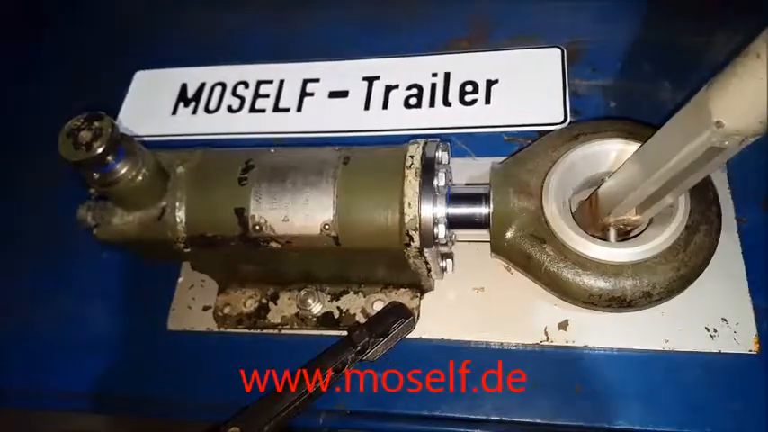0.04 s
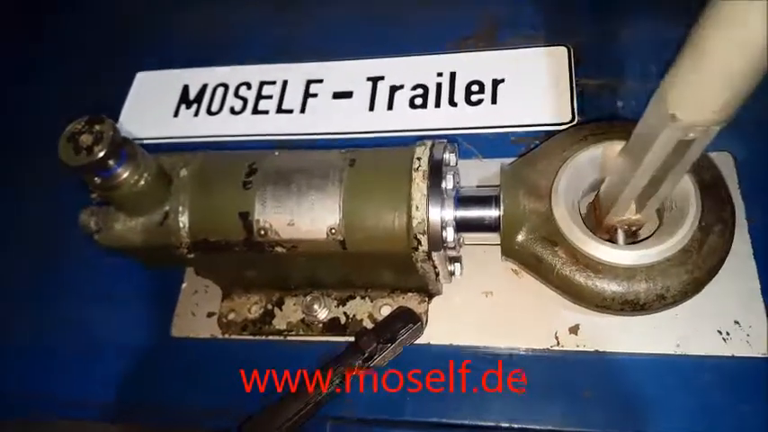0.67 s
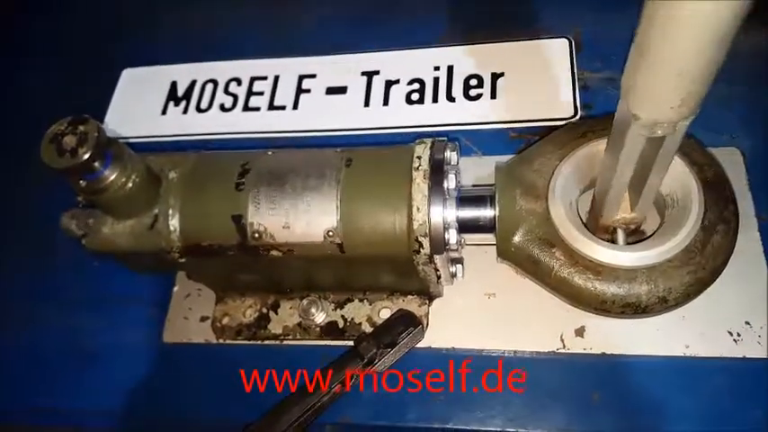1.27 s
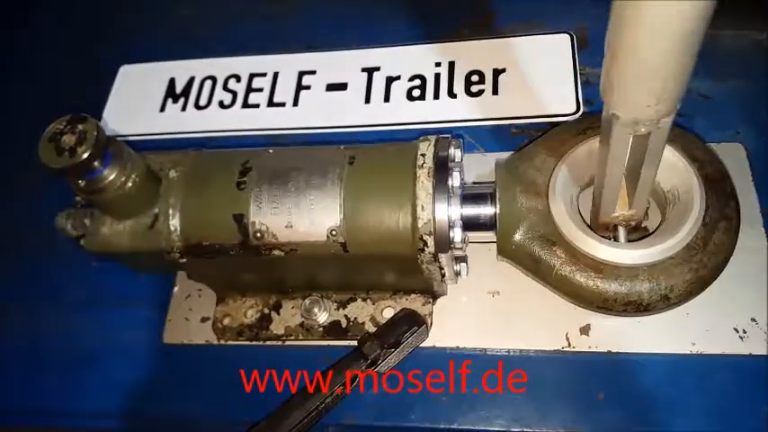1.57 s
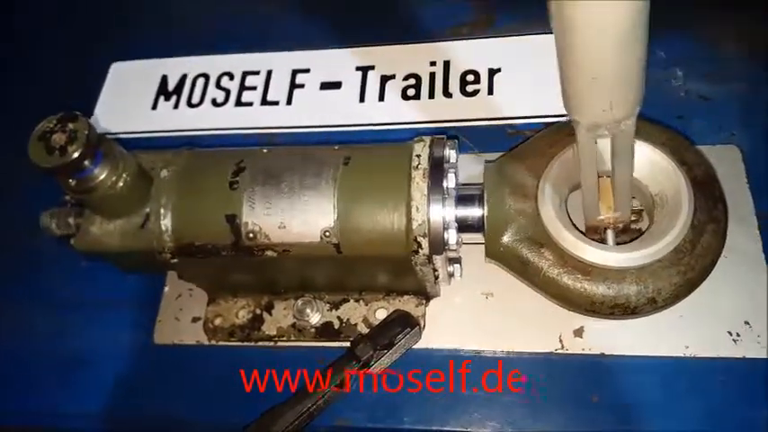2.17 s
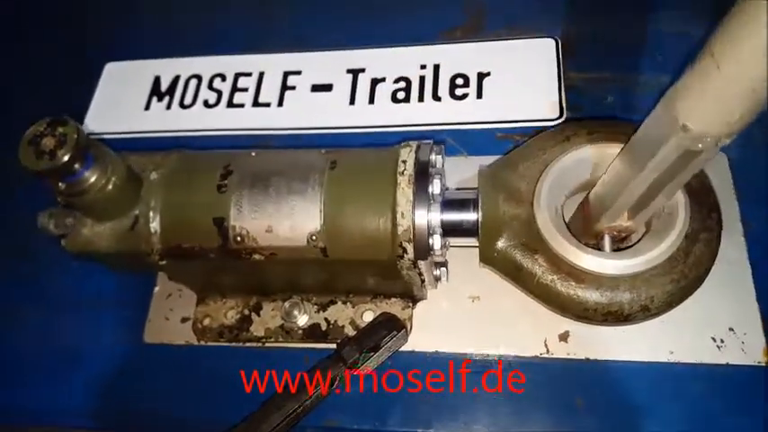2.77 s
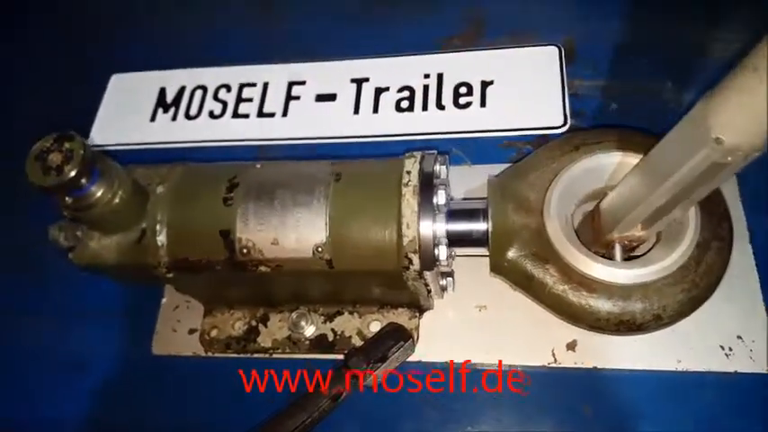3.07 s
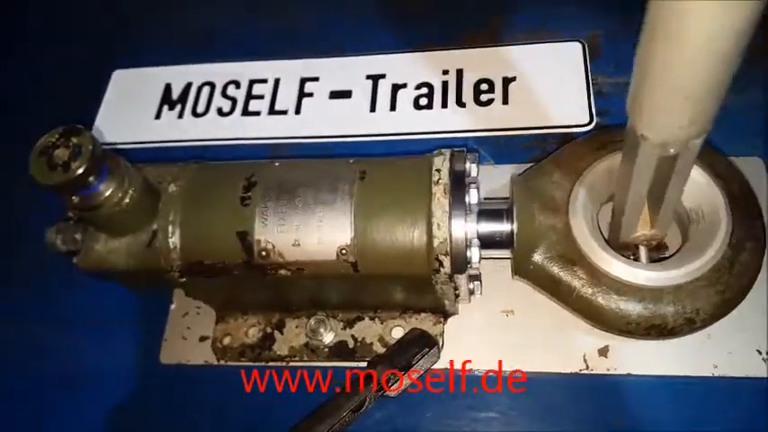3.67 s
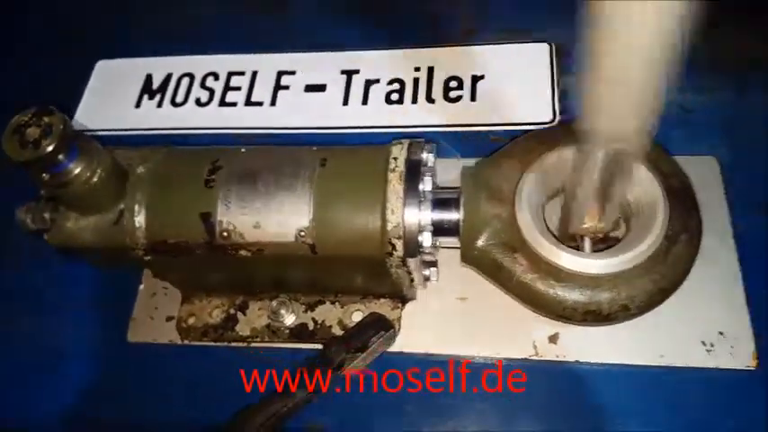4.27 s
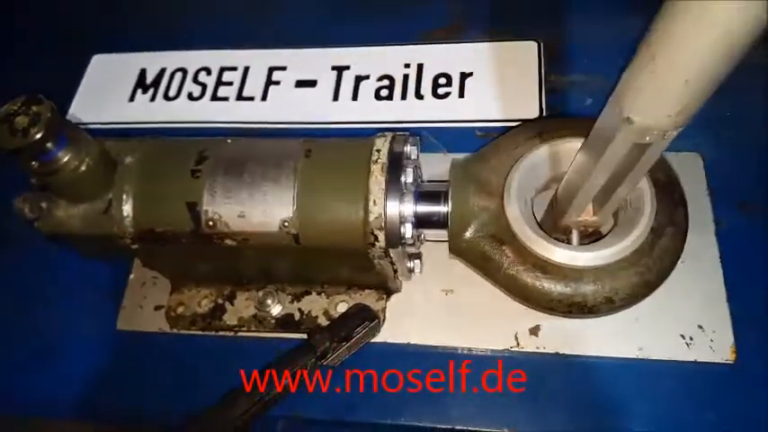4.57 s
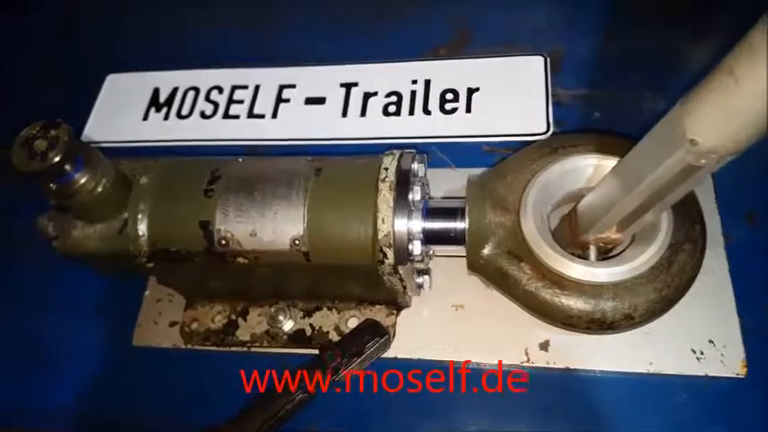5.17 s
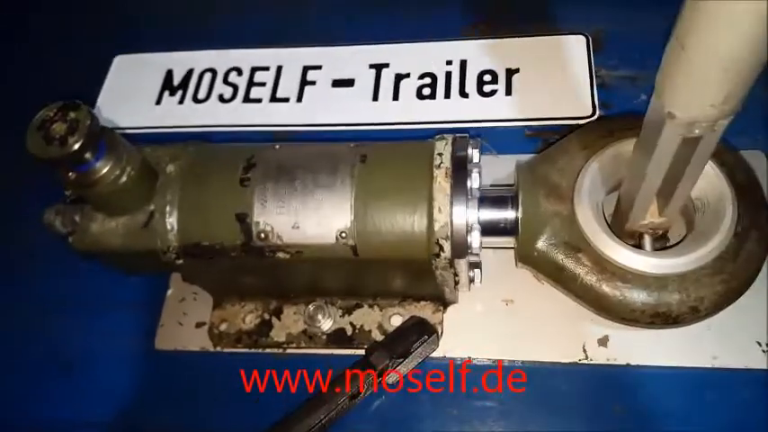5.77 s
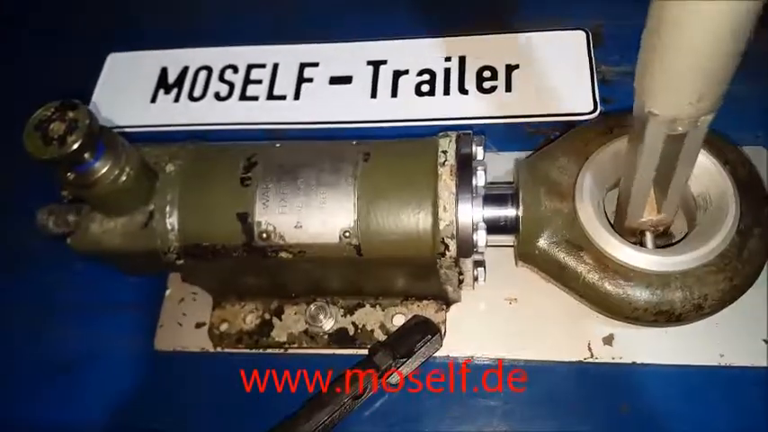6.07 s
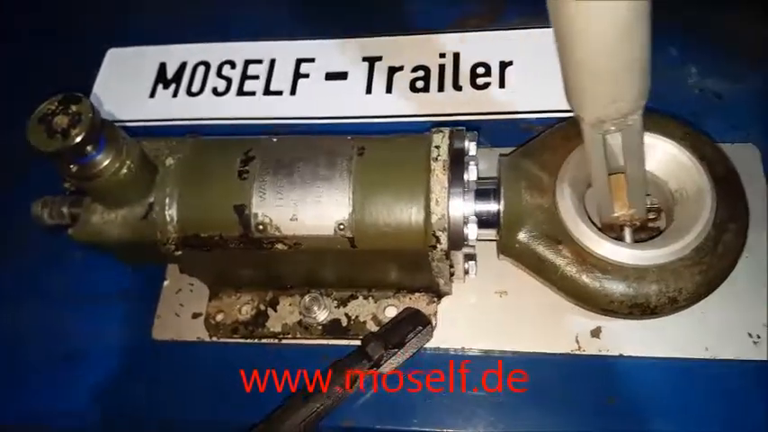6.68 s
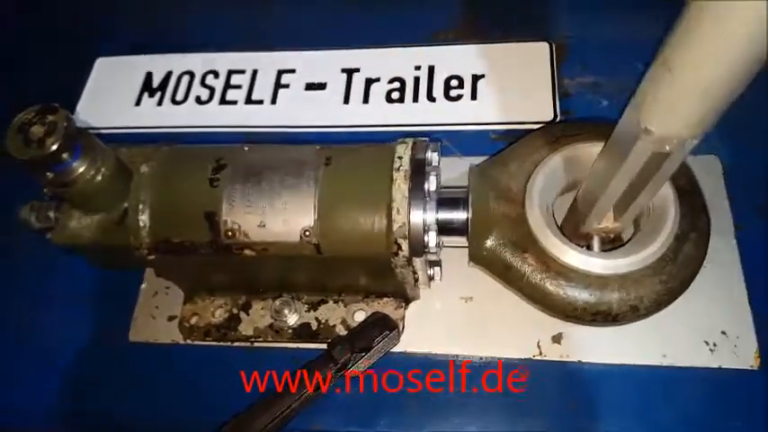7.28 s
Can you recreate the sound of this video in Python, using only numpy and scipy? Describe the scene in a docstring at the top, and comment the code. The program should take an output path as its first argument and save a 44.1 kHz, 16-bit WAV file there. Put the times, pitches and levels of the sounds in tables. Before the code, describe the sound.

Faint hiss and low room rumble run throughout. At about 0.2 seconds there is a tiny tick, then at 0.35 a steel bar clacks against the end ring of a hydraulic trailer damper, rattles and rings brightly, with a low thud from the workbench beneath. After a pause, the bar is levered back and forth five more times, landing at about 2.2, 3.4, 4.3, 5.5 and 6.9 seconds. Each stroke is a quick cluster of hard metallic clacks, followed by high ringing that fades in about half a second and a heavy, shuddering boom from the bench. The fifth rings strongly and the last cracks sharpest. From 2 seconds on, the bar scrapes softly over gritty steel between blows, with a few tiny clicks, and a last scrape runs from 7.2 seconds to the end. The sound is close and in stereo, with a hard-walled workshop echoing for about a second.

```python
"""Over a faint hiss comes a tiny tick, then steel clacks on steel and a workbench booms.
A steel bar levers the towing eye (the end ring) of a hydraulic trailer damper to and fro, six strokes
in all. Each time the bar rattles across the gap in the eye and lands with a clack. Bar, pin, barrel and
eye ring on, the bench booms under the load, and between blows the bar scrapes softly.
A hard-walled workshop echoes around two close microphones."""
import sys
import numpy as np
from scipy import signal
from scipy.fft import rfft, irfft
from scipy.io import wavfile
from scipy.ndimage import map_coordinates

SR = 44100
rng = np.random.default_rng(int(sys.argv[2]) if len(sys.argv) > 2 else 0)


def unload_audio(sound):
    """Save the sound as a 16-bit wav file, at the path given as the first command line argument."""
    columns = np.transpose(np.atleast_2d(sound))
    # keep every value between -1 and 1, then stretch to whole-number steps
    steps = np.round(np.clip(columns, -1, 1) * 32767)
    wavfile.write(sys.argv[1], SR, steps.astype(np.int16))


N = 332506


def undb(db):
    """Turn decibels into a number to multiply by."""
    return 10 ** (np.asarray(db) / 20)


def band(x, low_hz, high_hz, order=3):
    """Keep the sound between two frequencies."""
    sos = signal.butter(order, [low_hz, min(high_hz, .47 * SR)], "band", fs=SR, output="sos")
    return signal.sosfilt(sos, x)


def fade(fade_s, count=SR):
    """Die away by 60 dB in fade_s seconds; all fade times below mean this."""
    return np.exp(-np.log(1000) * np.arange(count) / SR / max(fade_s, .001))


def swell(rise_s, count=SR):
    """Rise from nothing to full strength."""
    return 1 - np.exp(-np.arange(count) / SR / rise_s)


def unit(x):
    """Scale a blow to the energy of 10 ms at full level."""
    return x / np.sqrt(np.sum(x ** 2, axis=-1, keepdims=True) / (SR / 100))


def add(track, start_s, x):
    """Mix x into the track at start_s."""
    i = int(start_s * SR)
    track[..., i:i + x.shape[-1]] += x[..., :N - i]


def look_up(hz, table, column=1):
    """Read a table at any frequency, blending between its rows."""
    table = np.array(table)
    return np.interp(np.log(hz), np.log(table[:, 0]), table[:, column])


def tilt(hz, db_per_octave, pivot_hz):
    """Decibels on a straight slope that is zero at pivot_hz."""
    return db_per_octave * np.log2(hz / pivot_hz)


def diffuse(count, wide_hz):
    """Spectra of noise from all sides at two microphones: alike in the bass, unrelated in the treble."""
    hz = np.fft.rfftfreq(count, 1 / SR) + 1
    mid, side = rfft(rng.standard_normal((2, count)))
    apart = hz / np.hypot(hz, wide_hz)
    return hz, (mid + np.array([[1], [-1]]) * apart * side) / np.sqrt(1 + apart ** 2)


def air(level_db=-56.5):
    """The room rumbles faintly under microphone hiss."""
    # tone of the still air and hiss: frequency_hz, level_db
    hiss_tone = [(15, -43.5), (25, -14.5), (53, -3), (97, -15.5), (263, -11), (394, -20), (607, -20),
                 (840, -26), (1330, -30), (3620, -38), (9570, -47.5), (11300, -45), (16000, -43)]
    hz, noise = diffuse(N, wide_hz=152)
    hiss = irfft(noise * undb(look_up(hz, hiss_tone)), N)
    return hiss * undb(level_db) / np.std(hiss)


def chatter(fade_s, low_hz, high_hz, width=0.87, spiky=0.27, rise_s=0.00056):
    """Two surfaces bounce and grind: a dying burst of tiny uneven hits, different left and right."""
    count = SR // 4
    mid, side, sizes = rng.standard_normal((3, count))
    grains = (mid + width * np.array([[1], [-1]]) * side) * np.exp(spiky * sizes)
    burst = grains * fade(fade_s, count) * swell(rise_s, count)
    return unit(band(burst, low_hz, high_hz, order=4))


def ticks(gain_db=-8, fade_s=.008):
    """The linked parts click lightly as they settle."""
    # light ticks: start_s, level_db
    clicks = [(0.228, -66), (1.112, -58.5), (2.815, -55), (2.834, -55), (5.031, -52)]
    out = np.zeros((2, N))
    for start_s, db in clicks:
        add(out, start_s, undb(db + gain_db) * chatter(fade_s, 3500, 14000, rise_s=.0002))
    return out


def wall_echoes(rise_s=0.0018):
    """Dense echoes of one instant of sound build up quickly and die away, the treble first."""
    # the workshop's echo: frequency_hz, level_db, fade_s
    room = [(60.5, -9, 0.79), (159, 3, 1), (425, 3.5, 0.94), (1225, -10, 0.9), (2700, -6.5, 0.83),
            (4300, -9, .66), (8000, -12, 0.6), (14100, -8, 0.5)]
    count = 3 * SR // 2
    hz, noise = diffuse(count, wide_hz=825)
    tail = 0
    for octave in np.arange(5, 15):  # 32 Hz to 16 kHz
        share = np.clip(1 - abs(np.log2(hz) - octave), 0, 1)
        wash = irfft(noise * share * undb(look_up(hz, room)), count)
        fade_s = look_up(2. ** octave, room, column=2)
        gain = np.sqrt(np.log(1000) / fade_s / SR)  # a longer tail is no louder in all
        tail = tail + gain * fade(fade_s, count) * wash
    return tail * swell(rise_s, count)


def workshop(x):
    """Sound thrown to the left and to the right meets different walls."""
    return sum(signal.fftconvolve(side[None], wall_echoes(), axes=1)[:, :N] for side in x)


def ring(tones, detune, scatter_db=0.5, count=SR):
    """An object's own tones fade; each blow lands elsewhere, so levels and pitches vary a little."""
    t = np.arange(count) / SR
    chance = rng.standard_normal((len(tones), 3))
    out = np.zeros(count)
    for (hz, db, fade_s), (sign, size, shift) in zip(tones, chance):
        wave = np.sign(sign) * np.sin(2 * np.pi * hz * (1 + detune * shift) * t)
        out += undb(db + scatter_db * size) * fade(fade_s, count) * wave
    return out


def ringing_parts(swing_db=10, swing_fade_s=0.096, held_fade_s=0.26, waver=0.2, wobble=0.0016):
    """A struck part swings hard at first, rings on unsteadily, and dies once a contact holds it."""
    # parts left free to ring: start_s, part, level_db, free_s
    strikes = [(0.349, "bar", -30, 0.39), (0.548, "barrel", -43, 0.77), (2.236, "pin", -41.5, 0.1),
               (2.406, "barrel", -43, 0.16), (3.281, "eye", -72, .06), (3.424, "barrel", -42.5, 0.46),
               (4.299, "eye", -54, .05), (5.446, "bar", -50, 0.0033), (5.531, "barrel", -28.5, 0.47),
               (5.535, "eye", -45.5, 0.094), (6.888, "eye", -59, 0.024), (6.96, "eye", -46, 0.14)]
    # each steel part's own tones: pitch_hz, level_db, fade_s
    part_tones = { "bar": [(1965, -13, .4), (2536, -14, .3), (4320, -5, .3), (4390, -5, .7),
                  (4455, -3, .45), (4492, -4, .3), (5075, -7, .3), (5130, 1, .65), (5165, -6, .3),
                  (5375, -15, .5), (10970, -13, .24), (11050, -19, .2), (12540, -22, .35),
                  (13680, -26, .28)], "barrel": [(3022, 1, .62), (3038, -5, .55), (3531, -17, .5),
                  (3870, -5, .22), (4800, -9, .08)], "pin": [(2003, -4, 0.36), (2223, -0.5, .4),
                  (2510, 2.5, 0.53), (3138, -0.5, .4), (5100, -2.5, .4), (5870, -0.5, .5), (5620, -2, .5),
                  (5905, 2.5, 0.46), (6130, -6.5, .4)], "eye": [(4000, -4, .2), (7757, 3, .3),
                  (7941, 6, .35), (8070, 9, .3), (8400, -2, .2), (12807, -16, .25)]}
    out = np.zeros(N)
    for start_s, part, db, free_s in strikes:
        tone = ring(part_tones[part], detune=.0003)
        shake, rock = band(rng.standard_normal((2, SR)), 7.3, 45, order=2)
        speed = 1 + wobble * rock / np.std(rock)  # rocking in its seat bends the pitch
        tone = map_coordinates(tone, [np.cumsum(speed)])
        swing = 1 + undb(swing_db) * fade(swing_fade_s)
        held_s = np.clip(np.arange(SR) / SR - free_s, 0, None)
        damping = np.exp(-np.log(1000) * held_s / held_fade_s)
        flutter = 1 + waver * shake / np.std(shake)
        add(out, start_s, undb(db) * swing * damping * flutter * tone)
    return out


def clacks(knock_db=-6, fizz_db=-4, room_db=4, glance_dryness=0.26):
    """Bar hits eye: a clank and a crack, brighter the sharper the edge that lands."""
    # steel landing on steel: start_s, level_db, sharpness_db_per_octave, fade_s
    hits = [(0.3499, -28, 0.4, 0.039), (0.468, -40, -3.5, .03), (0.54, -38, -0.5, 0.018),
            (0.546, -33.5, -5, 0.013), (0.573, -47, -7, 0.022), (0.636, -44, 5.5, 0.0081),
            (2.2086, -39.5, -3.5, .03), (2.2357, -19.5, 3, .02), (2.351, -33, 4, 0.02),
            (2.356, -34, 7, 0.037), (2.408, -22.5, 0.5, 0.015), (2.414, -37.5, -9.5, 0.011),
            (3.281, -61, -11.5, .03), (3.344, -31.5, 0.5, .032), (3.388, -33.5, 1.5, 0.1),
            (3.397, -37.5, -7.5, .03), (3.4182, -41, 7, .03), (3.424, -27, -2, 0.0093),
            (4.258, -46, -7, 0.024), (4.3009, -37, 4.5, 0.015), (4.331, -43.5, -8.5, 0.036),
            (4.349, -29.5, -2, 0.05), (4.3541, -29.5, 6.5, .03), (4.375, -28.5, 4, 0.019),
            (4.384, -28, -2, .04), (5.193, -72, -9.5, .03), (5.4475, -52, 0, .03),
            (5.472, -38.5, -2.5, 0.033), (5.5037, -32, -2, 0.031), (5.534, -21.5, 4.5, 0.057),
            (5.54, -31.5, -10.5, .03), (5.5735, -31.5, 7, 0.017), (6.8539, -49, -5, 0.052),
            (6.888, -39, 1.5, 0.018), (6.903, -33.5, -9.5, 0.049), (6.932, -22, 0.5, 0.056),
            (6.948, -36.5, 13.5, 0.059), (6.9578, -16.5, 4, 0.036)]
    # tones of the heavy body: pitch_hz, level_db, fade_s
    body_tones = [(788, -6.5, 0.071), (1033, -2.5, 0.037), (1030, 5, 0.024), (1135, -2, 0.065),
                  (1251, 1.5, 0.05), (1396, -6, .04), (1569, -7, 0.028), (1586, -4, .02)]
    direct, to_room = np.zeros((2, 2, N))
    for start_s, db, sharpness, fade_s in hits:
        clank = unit(ring(body_tones, detune=0.013, count=SR // 4))
        body = clank + undb(knock_db) * chatter(.15, 750, 1900)
        spit = chatter(fade_s, 11300, 13700) + undb(fizz_db) * chatter(fade_s, 8800, 14000)
        crack = chatter(fade_s, 1700, 3100)
        bite = chatter(fade_s, 2200, 6300)
        tick = chatter(fade_s, 6400, 8890)
        # sound, centre_hz, level_db, delay_s
        layers = [(body, 1100, -0.5, .003),  # the heavy body answers late
                  (crack, 2400, 0, 0), (bite, 4400, -4, 0), (tick, 7500, -12, 0), (spit, 12000, -26, 0)]
        room_gain = undb(room_db - glance_dryness * sharpness)  # sharp, glancing hits echo less
        for sound, hz, layer_db, delay_s in layers:
            blow = undb(db + layer_db + tilt(hz, sharpness, pivot_hz=2317)) * sound
            add(direct, start_s + delay_s, blow)
            add(to_room, start_s + delay_s, blow * room_gain)
    return direct, to_room


def bench_booms(rise_s=0.011, shudder_db=-4, shudder_hz=380, focus_db_per_octave=4):
    """The heavy bench swings up slowly after a blow, booms in its low tones and shudders."""
    # loads on the bench, a quicker push being higher: start_s, level_db, pitch_hz
    pushes = [(0.364, -24, 415), (0.469, -31, 88.6), (0.575, -23, 97), (0.895, -43, 73.2),
              (2.211, -31, 350), (2.242, -18.5, 180), (2.429, -13, 99), (3.256, -37.5, 110),
              (3.351, -27.5, 353), (3.397, -22.5, 86), (3.427, -13.5, 86), (4.262, -27, 74.5),
              (4.299, -21.5, 188), (4.396, -12.5, 122), (5.194, -44.5, 117), (5.449, -32, 170),
              (5.519, -19, 352), (5.576, -15.5, 240), (6.857, -33, 150), (6.891, -20, 225),
              (6.972, -13.5, 230)]
    # the bench's own tones: pitch_hz, level_db, fade_s
    bench_tones = [(85.16, 13.5, 0.19), (103, 0.5, 0.16), (128.2, 3, 0.22), (166.26, 0, 0.21),
                   (203.3, 3.5, 0.15), (230.7, 5.5, 0.11), (276.5, -7, 0.31), (319, -3, 0.099),
                   (376.4, 0, 0.1), (413.6, -5.5, 0.37), (459, -9.5, 0.66), (508, -0.5, 0.14),
                   (500, -7.5, 0.24)]
    edges_hz, group_db = [105, 150, 260], (-4.5, -4, -2, -7)  # sway, frame, top, panels
    groups = np.searchsorted(edges_hz, np.array(bench_tones)[:, 0])
    out = np.zeros((2, N))
    for start_s, push_db, pitch_hz in pushes:
        # tones further from the pitch of the push answer less
        answer_db = lambda hz: push_db - abs(tilt(hz, focus_db_per_octave, pitch_hz))
        tones = [(hz, db + group_db[group] + answer_db(hz), fade_s)
                 for (hz, db, fade_s), group in zip(bench_tones, groups)]
        add(out, start_s, swell(rise_s) * ring(tones, detune=.012))
        shudder = chatter(0.35, 150, 617, width=0.31, spiky=.1, rise_s=0.026)
        add(out, start_s, undb(shudder_db + answer_db(shudder_hz)) * shudder)
    return band(out, 74, 1200, order=4)


def sliding(catch_db=1.0, grit=0.38):
    """The bar scrapes over gritty steel, speeding up, slowing down and catching a little."""
    # slides of the bar in the eye: start_s, length_s, level_db
    slides = [(2.001, .3, -65), (2.62, 1, -62.5), (3.65, 0.7, -62), (4.598, 0.56, -65.5),
              (5.803, 0.39, -62), (6.612, 0.27, -61.5), (7.198, 0.63, -59)]
    # tone of the scraping: frequency_hz, level_db
    scrape_tone = [(300, -6.5), (700, 8.5), (1300, 2), (2700, -1.5), (4000, -9), (5800, -11), (7000, -10),
                   (8500, -8), (10000, -14), (12500, -13.5), (16000, -15.5)]
    t = np.arange(N) / SR
    speed = np.zeros(N)
    for start_s, length_s, db in slides:
        position = 2 * (t - start_s) / length_s - 1  # -1 to 1 during the slide
        speed += undb(db) * np.sqrt(np.clip(1 - position ** 2, 0, 1))
    hz = np.fft.rfftfreq(N, 1 / SR) + 1
    grains = rng.standard_normal((2, N)) * np.exp(grit * rng.standard_normal(N))
    rub = irfft(rfft(grains) * undb(look_up(hz, scrape_tone)), N)
    catch = band(rng.standard_normal(N), 4, 40, order=2)
    return speed * undb(catch_db * catch / np.std(catch)) * rub / np.std(rub)


def microphones(x, delay_s=.00006, treble_gap_db=-3.5):
    """Direct sound reaches the left microphone a little later than the right, and with less treble."""
    hz = np.fft.rfftfreq(N, 1 / SR)
    lean = undb(treble_gap_db / 2 * hz ** 2 / (hz ** 2 + 2500 ** 2))
    delay = np.exp(-2j * np.pi * hz * delay_s)
    left, right = rfft(x)
    return irfft(np.array([left * lean * delay, right / lean]), N)


def scene(ringing_room_db=-8, tick_room_db=-10):
    """Steel and bench are heard directly and off the walls, over the hiss."""
    clack, clack_to_room = clacks()
    ringing, boom, clicks = ringing_parts(), bench_booms(), ticks()
    direct = clack + ringing + boom + clicks + sliding()
    to_room = clack_to_room + boom + undb(ringing_room_db) * ringing + undb(tick_room_db) * clicks
    return microphones(direct) + workshop(to_room) + air()


def record(dry):
    """Clip peaks at full scale and cut the treble above 16 kHz."""
    treble_cut = signal.ellip(8, .2, 70, 16000, fs=SR, output="sos")
    return signal.sosfilt(treble_cut, np.clip(dry, -1, 1))


dry = scene()
out = record(dry)
unload_audio(out)
```